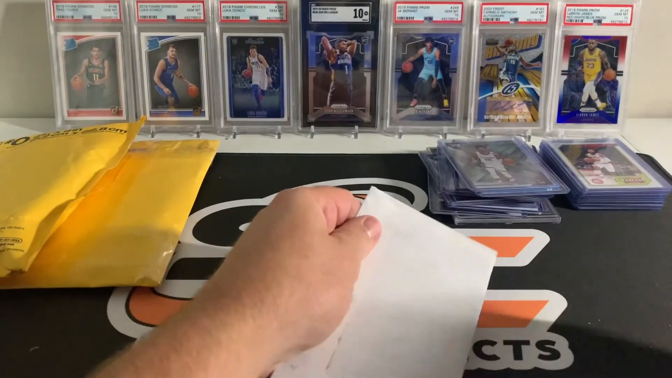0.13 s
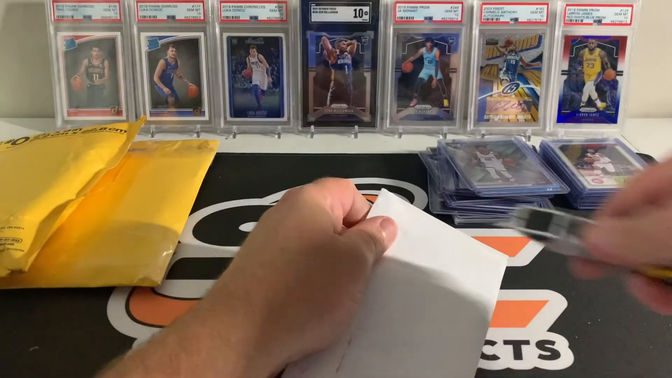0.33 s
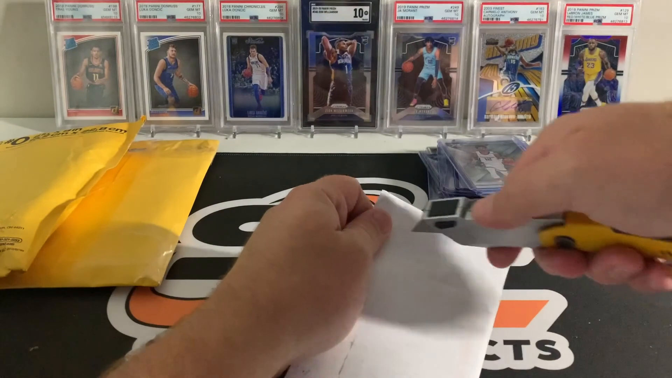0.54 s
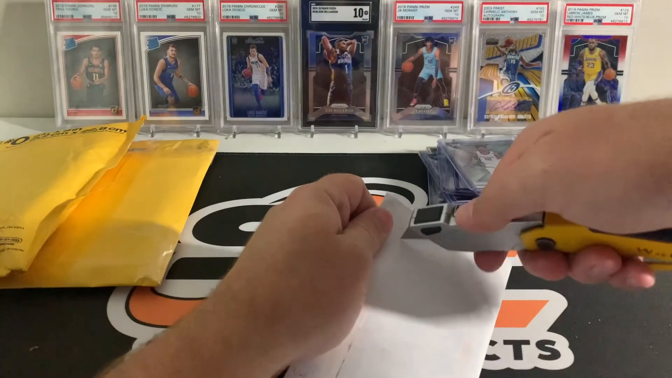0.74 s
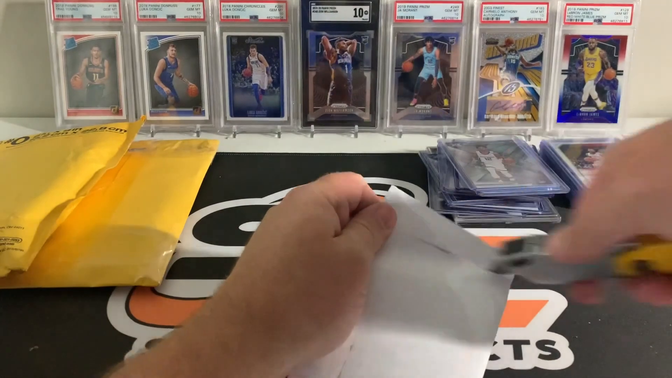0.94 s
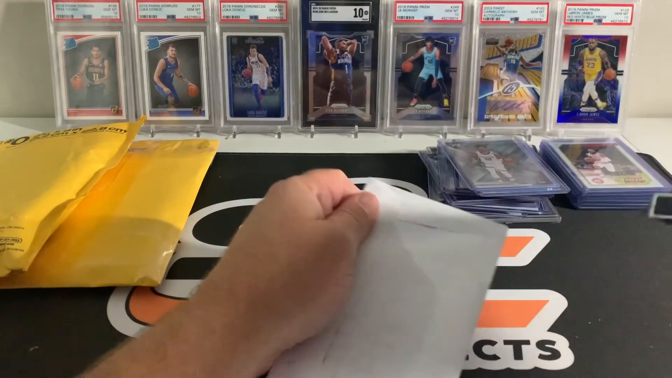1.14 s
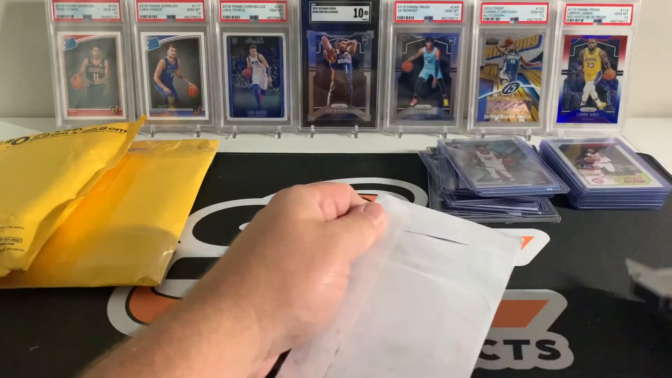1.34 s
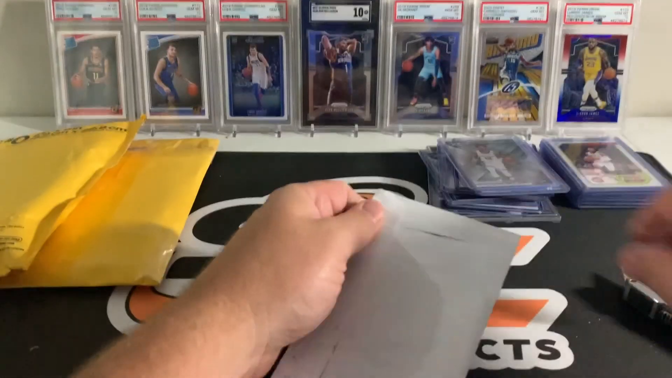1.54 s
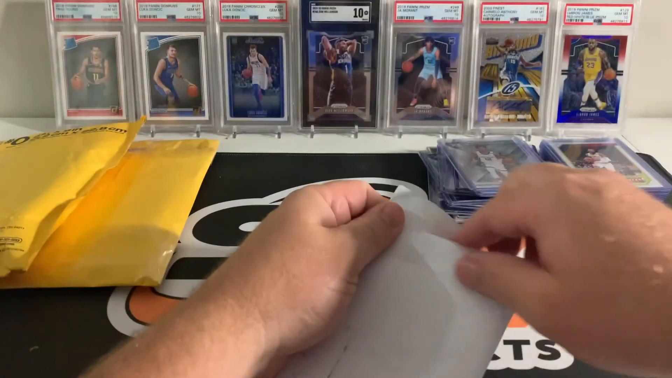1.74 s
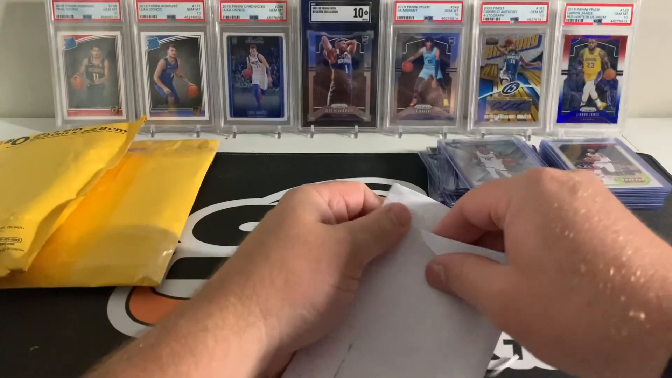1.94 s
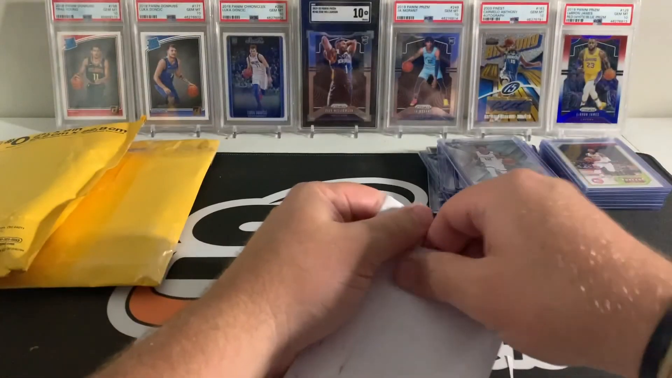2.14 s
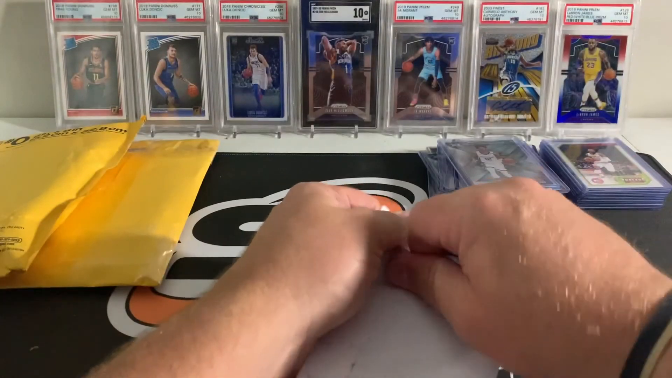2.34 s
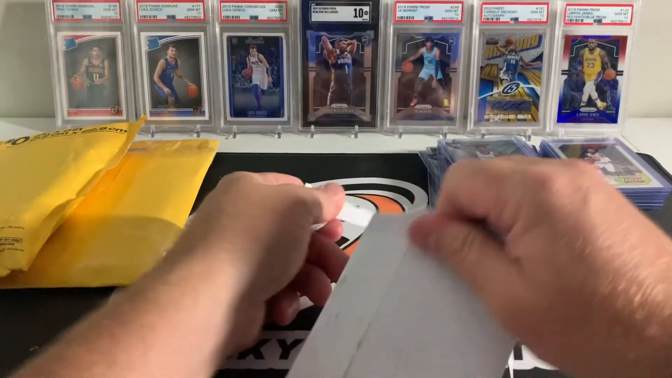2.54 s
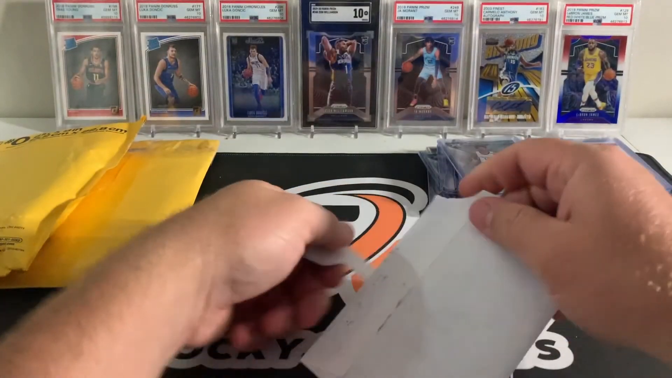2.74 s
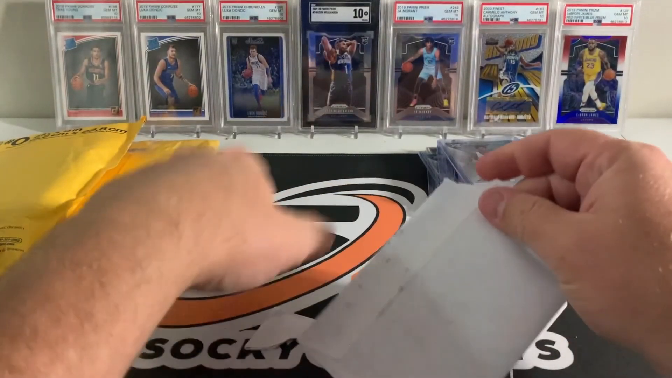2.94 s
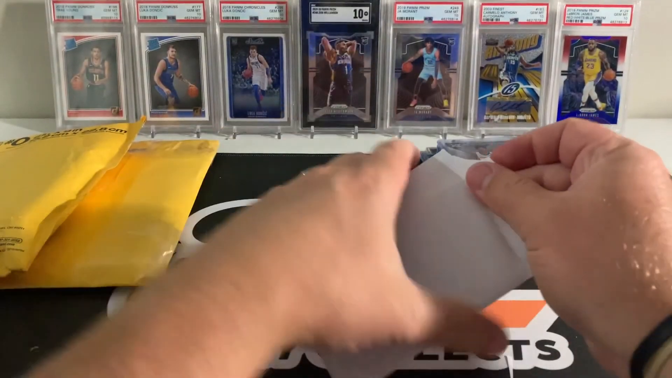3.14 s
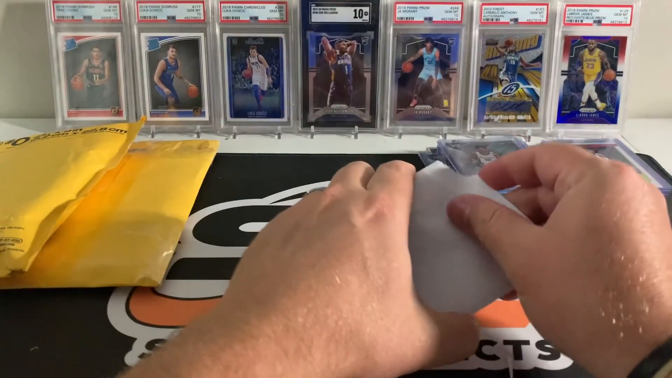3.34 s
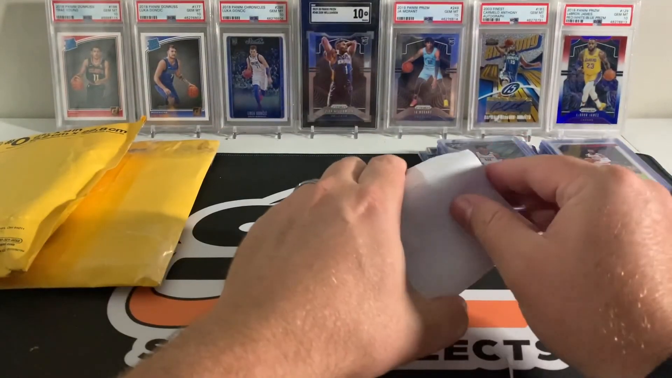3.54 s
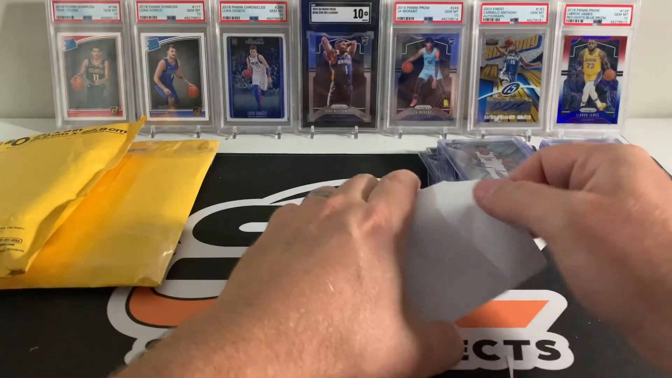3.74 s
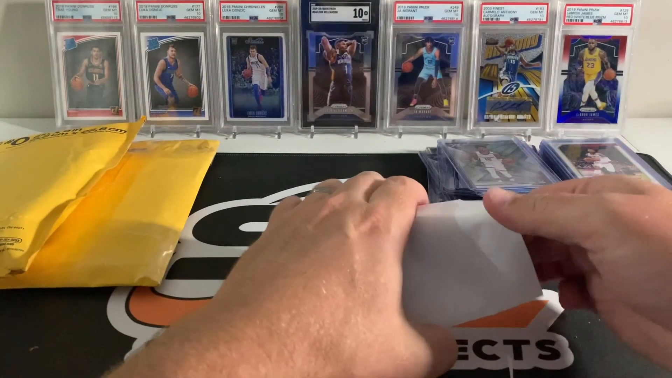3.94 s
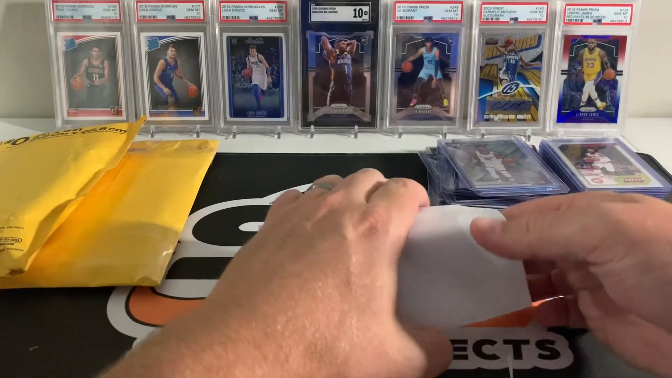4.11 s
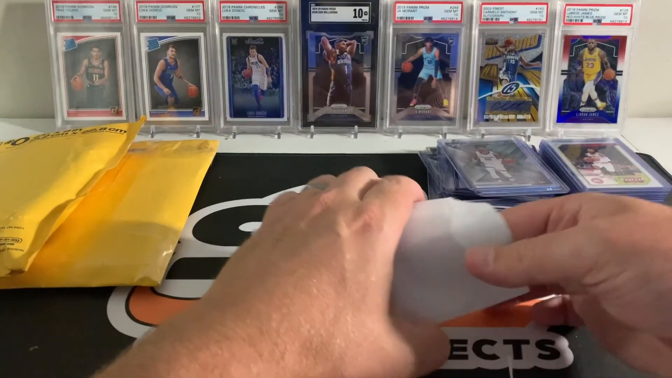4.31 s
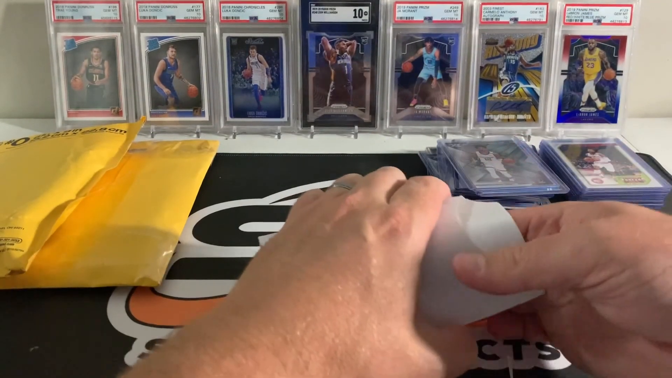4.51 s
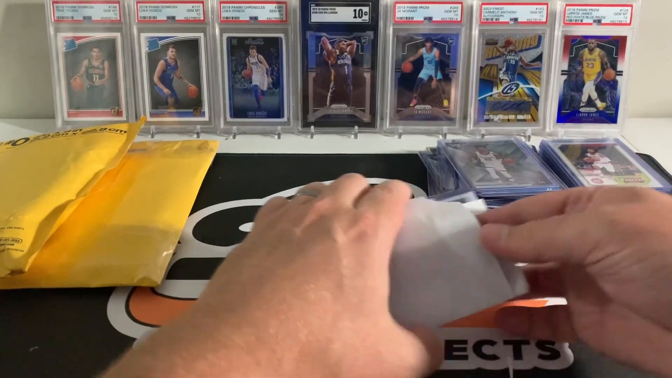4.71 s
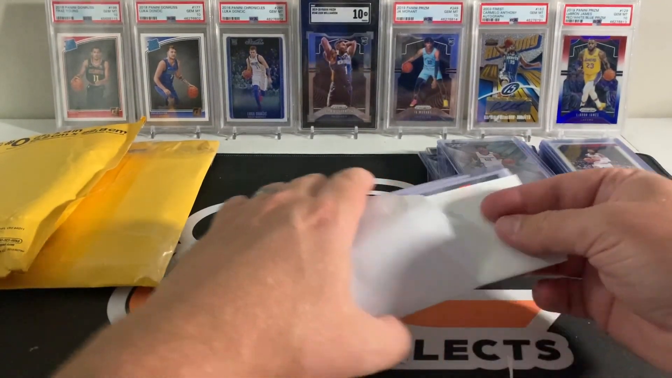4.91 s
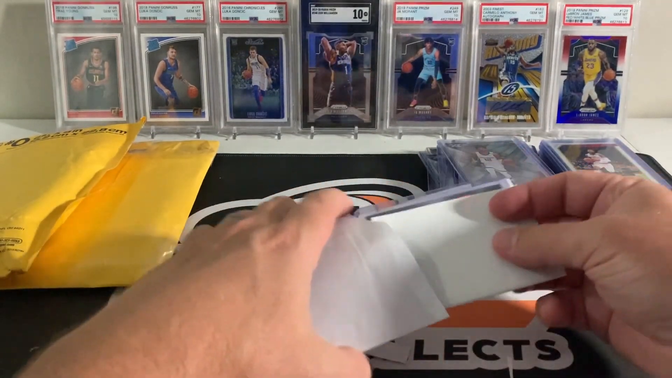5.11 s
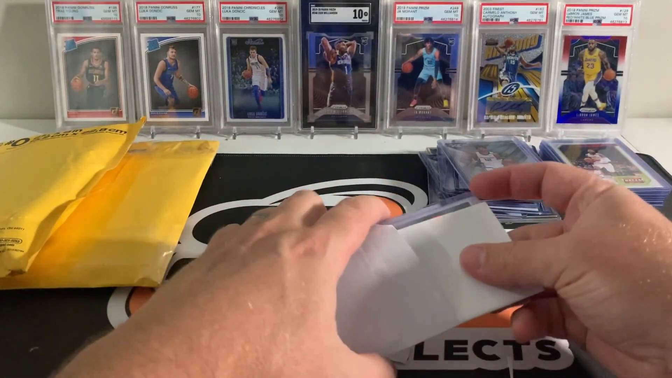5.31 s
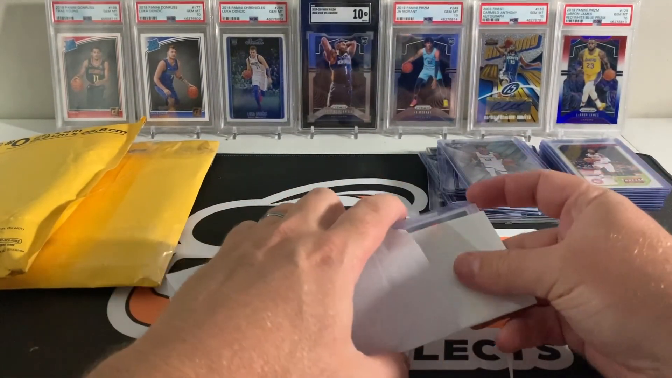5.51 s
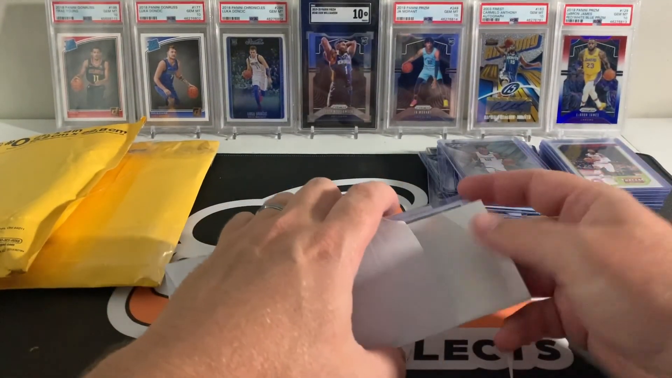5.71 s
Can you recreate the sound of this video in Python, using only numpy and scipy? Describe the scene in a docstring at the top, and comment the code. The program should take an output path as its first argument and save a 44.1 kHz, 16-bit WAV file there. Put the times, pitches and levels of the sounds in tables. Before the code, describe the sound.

A utility knife clicks and scrapes as it is picked up from a table. It slits a paper envelope in one quick zip, then is put down with a clatter and a low thump. The flap tears off in a short rip, and the envelope snaps and crinkles as it is squeezed open, ending with the contents sliding out. The microphone is close, in a quiet room.

```python
"""A paper envelope is slit with a utility knife, its flap torn off, its sides squeezed open and the contents
slid out. Fibres slip and break in clumps of tiny clicks; the sheet snaps, and rumbles as it bends.
The knife's loose parts click as it is picked up and laid down, and the table top booms under knocks.
All of it plays close to a small two-port microphone in a quiet room."""
import sys
import numpy as np
from scipy import signal
from scipy.fft import rfft, irfft
from scipy.io import wavfile
from scipy.ndimage import uniform_filter1d

SR = 44100
rng = np.random.default_rng(int(sys.argv[2]) if len(sys.argv) > 2 else 0)


def materialize(psi):
    """Save the field psi as 16-bit PCM at rate SR to the path in sys.argv[1].

    A 1-D psi becomes a single channel; in a 2-D psi each row is a channel.
    """
    bounded = np.clip(np.atleast_2d(psi).T, -1, 1)
    quanta = np.round(bounded * 32767).astype(np.int16)
    wavfile.write(sys.argv[1], SR, quanta)


N = 258426
TIME, HZ = np.arange(N) / SR, np.fft.rfftfreq(N, 1 / SR)


def slit():
    """The blade runs through the paper: a dense, even zip of breaking fibres."""
    # swell of the cut: (time [s], level [dB], brightness [dB])
    swell = [(0.89, -53, -8), (0.902, -62, -9), (0.908, -38.5, -6.5), (0.985, -25.5, 6), (1.02, -23, 4.5),
             (1.056, -26.5, 1), (1.094, -50.5, -14), (1.13, -81, 4)]
    # EQ of the cut: (frequency [Hz], gain [dB])
    colour = [(400, -10.5), (700, -9.5), (1000, -0.5), (1250, 1), (1500, 4), (1900, -1), (2400, -2.5),
              (5500, -4.5), (7000, -4.5), (12000, -2.5), (16000, -7)]
    grain = fibres(per_s=7000, spread_db=1.5, clump_db=0.9, smooth=1.2)
    return paper_voice(grain, colour, *level_and_treble(swell), patchy_db=0.73)


def tear():
    """The flap rips off: breaking fibres swell and brighten, then stop short."""
    # swell of the rip: (time [s], level [dB], brightness [dB])
    swell = [(2.3, -46, -23), (2.32, -43.5, -12), (2.388, -42, -6), (2.436, -30.5, -2), (2.52, -22.5, 5.5),
             (2.536, -42.5, -26.5), (2.6, -70, 11)]
    # EQ of the rip: (frequency [Hz], gain [dB])
    colour = [(400, -25), (800, -18.5), (1400, -8.5), (2800, -10.5), (5500, -9.5), (6800, -3),
              (8800, -12.5), (11000, -5), (14000, -6.5), (16000, -15.5)]
    grain = fibres(per_s=5400, spread_db=0, clump_db=1.2, smooth=1.3)
    return paper_voice(grain, colour, *level_and_treble(swell), patchy_db=3.3)


def snaps():
    """Paper snaps as the blade catches it, it rips, or it bends: a crack, a ringing panel, a buckle."""
    # paper snaps: (time [s], panel peak [dB], panel pitch [Hz], crinkle [dB re panel],
    # crack [dB re panel], buckle [dB re panel], buckle pitch [Hz])
    paper_snaps = [(0.776, -45.5, 1560, -4.5, -30, -5, 306), (.865, -24.5, 1230, -21, -26, -11.5, 372),
                   (0.91, -38.5, 1440, 10.5, -14, -10.5, 280), (1.058, -24.5, 1220, -6, 1, -5, 326),
                   (1.069, -32, 940, -1, -9, -9, 269), (1.167, -46.5, 1300, -8, -3, -16, 300),
                   (1.759, -39.5, 960, -13, 2, -8, 347), (1.918, -39, 1290, -20, -15, -6, 330),
                   (1.933, -28, 1060, -8, 2, -12.5, 332), (2.323, -35.5, 1200, -15, 0, -16, 366),
                   (2.434, -39, 1030, 4, 18, -15, 328), (2.451, -34.5, 1000, 14, 8, -16, 620),
                   (2.482, -27.5, 1580, 11.5, -4, -16, 397), (2.508, -47, 2150, 9, 6, -16, 328),
                   (2.518, -32.5, 1180, 0, 20, -10, 307), (2.521, -35, 1500, 9, 14, -16, 300),
                   (2.988, -45, 1180, -2, 8, 2, 328), (3.007, -40.5, 1550, 6.5, -21, 0, 175),
                   (3.019, -46.5, 1340, 3, -6, 1, 299), (3.256, -47.5, 960, 1, 2, -4.5, 243),
                   (3.282, -47, 1120, 9, -6, -22, 277), (3.305, -38, 1020, 0, -10, -22, 361),
                   (3.336, -41, 950, 7, 2, -9.5, 382), (3.393, -33.5, 1200, -1, -0.5, -13.5, 362),
                   (3.468, -26.5, 1730, 9.5, 17.5, -11, 402), (3.473, -24.5, 2550, -25, -22, -22, 332),
                   (3.525, -33, 1580, -4, 5, -4, 402), (3.55, -37, 1310, -3, -11, -3, 259),
                   (3.646, -34, 1680, 7, 8, 0.5, 373), (3.7, -28, 1110, -16, -40, -3.5, 452),
                   (3.713, -22.5, 1340, 0, -37, -14, 177), (3.753, -31.5, 980, -29, -26, -9, 374),
                   (3.777, -26, 1600, -14, -41, -4.5, 391), (3.8139, -26.5, 1540, 8, 12, -5, 312),
                   (3.944, -41.5, 1160, -2, -11, 4, 161), (3.977, -30, 1560, -18, -31, -11, 300),
                   (4.034, -23.5, 980, 0, -27, -0.5, 178), (4.102, -28.5, 890, -33, -8.5, -15, 181),
                   (4.267, -27.5, 1140, -25, -14, -6.5, 238), (4.331, -25.5, 1370, -12, -15, -14, 300),
                   (4.341, -12.5, 1340, -3.5, 1, -9, 341), (4.375, -23, 1280, -29, -20, -16, 327),
                   (4.394, -28.5, 1200, -16, -18, -22, 380), (4.451, -21, 1440, 0.5, 8.5, -17.5, 236),
                   (4.464, -30, 1180, -21, -26, -13, 410), (4.584, -40, 2090, -27, 3, -11, 223),
                   (4.647, -28.5, 1440, -30, -31, -8.5, 395), (4.69, -21, 1710, -3, 3, -11, 454),
                   (4.749, -31, 1350, 6.5, 0, -15, 480), (5.023, -18.5, 1220, 3, -21, -10.5, 450),
                   (5.201, -46, 920, -14, 0, 2, 270), (5.287, -56.5, 1990, -7, 1, 12, 457),
                   (5.577, -45, 2540, 3, 9, -3.5, 350), (5.635, -35.5, 940, -27, -29, -7, 350)]
    # modes of the whole envelope: (multiple of the buckle pitch, level [dB], t60 [s])
    buckle_modes = [(.55, -16, 0.055), (1.0, 7.5, 0.017), (1.9, -15, 0.039)]
    out, t = np.zeros(N), np.arange(4000) / SR
    rise_s, t60 = 0.001, 0.017
    shape = attack(t, rise_s) ** 2 * (decay(t, t60) + 0.15 * gain_of(-16 * t / t60))  # hit plus slow tail
    for s, db, panel_hz, crinkle_db, crack_db, buckle_db, buckle_hz in paper_snaps:
        burst = shape * rng.standard_normal(len(t))
        panel = narrowed(burst, panel_hz, q=1.13)
        crinkle = narrowed(burst, hz=3110, q=0.86)
        tick = attack(t, 0.00044) * (crack(t, t60=0.008) + gain_of(-12) * crack(t, t60=0.03))
        modes = [(ratio * buckle_hz, mode_db, ring_s) for ratio, mode_db, ring_s in buckle_modes]
        buckle = ring(modes, t) * attack(t, 0.0075)
        start = s - rise_s
        add(out, start, peaked(panel, db) + peaked(crinkle, db + crinkle_db))
        add(out, s, peaked(tick, db + crack_db))  # at the top of the snap
        add(out, start + 0.00372, peaked(buckle, db + buckle_db))  # the slow buckle follows the crack
    return out


def rubbing():
    """Fingers and paper slide on paper; each stroke swells and fades, and overlaps add in power."""
    # strokes: (peak time [s], rise [s], fall [s], level [dB], brightness [dB], flexing [dB re level])
    strokes = [(0.03, 0.19, 0.13, -55.5, 2, -2.5), (.194, 0.043, 0.084, -41, -4.5, -1.5),
               (0.301, 0.24, 0.22, -50.5, -10.5, -8), (0.609, 0.045, 0.14, -59.5, -13.5, -1.5),
               (.84, 0.092, .06, -61, -14, 1.5), (1.13, .03, 0.15, -56, -5, -12.5),
               (1.363, 0.1, 0.28, -55, -8, -16), (1.521, 0.016, 0.011, -37.5, -0.5, -11),
               (1.56, 0.046, 0.052, -42, -28, 3.5), (1.64, .05, 0.13, -63, -9, 0),
               (1.82, 0.063, 0.15, -48.5, 4, -12), (2.0, 0.15, 0.24, -47.5, -4.5, -21),
               (2.23, 0.091, 0.066, -41.5, 1.5, -40), (2.6, 0.1, 0.06, -54.5, 7.5, -8.5),
               (2.72, 0.094, 0.17, -51, 8.5, -15), (3.0, 0.17, 0.15, -60.5, 3.5, -7),
               (3.15, 0.046, 0.09, -62.5, 5, -18), (3.279, 0.028, 0.6, -54.5, 2.5, -13.5),
               (3.481, 0.026, 0.094, -36, -4, -12.5), (3.64, 0.048, 0.073, -45.5, -5, -16.5),
               (3.714, 0.019, 0.029, -34.5, -25, -8), (3.84, 0.12, 0.033, -42, -9, -12.5),
               (4.04, 0.19, 0.16, -41.5, -6.5, -9.5), (4.2, 0.072, 0.12, -48, -8, -5.5),
               (4.29, 0.06, 0.039, -40.5, -1.5, -12), (4.37, 0.057, 0.27, -38, -2, -15),
               (4.6, 0.02, 0.022, -42, -4.5, -17), (4.691, 0.039, 0.041, -31, -18.5, -17),
               (4.789, 0.12, 0.085, -36, 4.5, -24), (4.952, 0.096, 0.18, -40, 3, -32),
               (5.039, 0.06, 0.066, -39, -1.5, -14.5), (5.241, 0.074, 0.12, -47.5, 4.5, -10),
               (5.359, 0.082, 0.14, -48.5, 1, -18), (5.63, 0.25, 0.12, -44, -8.5, -17.5),
               (5.851, 0.085, .1, -48.5, -1.5, -13.5)]
    # EQ of the friction: (frequency [Hz], gain [dB])
    colour = [(400, -9.5), (700, -9), (1250, 0.5), (2100, -2.5), (3000, 0), (3700, -4.5), (4500, -1),
              (5600, -6), (6800, -1.5), (8000, -7), (11000, -1.5), (13000, -5.5), (16000, -5.5)]
    fade_db, roundness = 16, 2.09  # fade_db down at one rise before the peak and one fall after
    t, power = np.arange(0, N + 64, 64) / SR, 0
    for s, rise, fall, level_db, bright_db, flex_db in strokes:
        away = np.where(t < s, (s - t) / rise, (t - s) / fall)
        shape_db = np.maximum(level_db - fade_db * away ** roundness, -150)
        power = power + gain_of(shape_db + np.array([[0], [bright_db], [flex_db]])) ** 2
    level, treble, bending = [np.interp(TIME, t, np.sqrt(p)) for p in power]
    grain = fibres(per_s=3000, spread_db=2, clump_db=0.9, smooth=2.5)
    return paper_voice(grain, colour, level, treble, patchy_db=2.5) + flexing(bending)


def flexing(level):
    """The sheet rumbles as it bends under the fingers."""
    # EQ of the rumble: (frequency [Hz], gain [dB])
    colour = [(50, -26), (120, -3.5), (200, -4), (400, -4.5), (600, -24.5), (1200, -42.5)]
    return level * coloured(fibres(per_s=900, spread_db=1.2, clump_db=1.5, smooth=1.6), colour)


def knife_clicks():
    """Loose metal and plastic parts crack and rattle; the grip damps the handle and shifts its modes."""
    # clicks: (time [s], peak [dB], crack [dB re peak], hardness [dB/octave])
    clicks = [(0.17, -21.5, 0.5, 11), (0.286, -29.5, -4.5, 9.5), (0.384, -40.5, 2, -6),
              (0.392, -42.5, -21, -9), (1.226, -51.5, 7.5, -12), (1.276, -52.5, 4, 4),
              (1.471, -44, -24, -11), (1.512, -34, -0.5, -1.5), (1.535, -24, -6, 1), (1.572, -26, -1, 10.5)]
    # handle modes before the grip acts: (frequency [Hz], level [dB], t60 [s])
    modes = [(460, -8.5, 0.0072), (1330, -22, 0.12), (1950, 16.5, 0.026), (2840, 10.5, 0.26),
             (4040, 4.5, 0.097), (5014, 9.5, 0.023)]
    out, t = np.zeros(N), np.arange(4000) / SR
    rattle_s, grip_t60 = 0.003, 0.013
    for s, db, crack_db, hardness_db in clicks:
        rattle = rng.standard_normal(500) * np.exp(-t[:500] / rattle_s)
        detune = rng.uniform(0.782, 1.067)
        handle = ring(modes, t * detune, hardness_db) * decay(t, grip_t60)
        add(out, s, peaked(np.convolve(rattle, handle), db))
        add(out, s, peaked(crack(t, t60=0.014), db + crack_db))
    return out


def knife_drag():
    """The knife drags off the mat: a scrape with a thin, wavering squeak riding on it."""
    # the drag: (time [s], level [dB], squeak pitch [Hz], squeak [dB re level])
    gesture = [(0.171, -33, 3800, -17), (.19, -45.5, 3850, -3), (0.21, -40, 3750, 4.5),
               (0.229, -44, 3590, 1.5), (.25, -72, 3870, -17)]
    # EQ of the scrape: (frequency [Hz], gain [dB])
    colour = [(500, -4.5), (1100, -9), (1700, -6), (2500, -16), (6000, -30), (16000, -22.5)]
    s, level_db, hz, squeak_db = np.transpose(gesture)
    scrape = coloured(fibres(per_s=2300, spread_db=1, clump_db=1.5, smooth=1.2), colour)
    waver = uniform_filter1d(rng.standard_normal(N), size=200)
    pitch_hz = np.interp(TIME, s, hz) * (1 + 0.626 * waver)
    squeak = gain_of(np.interp(TIME, s, squeak_db)) * np.sin(2 * np.pi * np.cumsum(pitch_hz) / SR)
    return fader(s, level_db) * (scrape + squeak)


def table_knocks():
    """A soft push of a few ms sets the table top booming; harder blows favour the upper modes."""
    # knocks: (time [s], peak [dB], hardness [dB/octave], t60 factor: small where a hand stays on the top)
    knocks = [(0.076, -31.5, 7.5, 1.14), (.117, -32, 18, 1), (.135, -28.5, 12, 0.76), (0.167, -24, 14, 1.2),
              (.19, -30.5, 12, 3.5), (1.487, -38.5, -12, .6), (1.507, -21, -5.5, 0.4),
              (1.537, -22, -4.5, 2.1), (1.545, -19.5, 2.5, 0.91), (1.558, -24, -14, 1.1),
              (1.571, -15.5, -8.5, 0.25), (1.582, -24, -3, 1), (2.502, -48, -6, 1.1),
              (2.557, -43.5, 2, 0.48), (2.947, -28, 0, 0.54), (2.964, -30.5, -2.5, .28),
              (3.051, -34, 1.5, 0.86), (3.057, -32, 5.5, 0.41)]
    # modes of the top: (frequency [Hz], level [dB], t60 [s])
    top_modes = [(64.7, 7, 0.13), (70.5, -13.5, 0.96), (99, 8.5, 0.12), (143.5, 3.5, 0.14),
                 (281, 3.5, 0.079), (427.5, 2.5, 0.029)]
    out, t = np.zeros(N), np.arange(SR // 2) / SR
    for s, db, hardness_db, sustain in knocks:
        modes = [(hz, mode_db, t60 * sustain) for hz, mode_db, t60 in top_modes]
        add(out, s, peaked(ring(modes, t, hardness_db) * attack(t, 0.0076), db))
    return out


def lingering_hiss():
    """A faint, narrow band of hiss hangs on after the knife is lifted."""
    # swell of the hiss: (time [s], level [dB])
    swell = [(.25, -78), (.4, -73), (.58, -65.5), (.7, -68), (.77, -87)]
    band = evened(narrowed(rng.standard_normal(N), hz=1148, q=7.8))
    return fader(*np.transpose(swell)) * band


def room_tone():
    """The quiet room: a steady bed of bass-heavy noise."""
    # EQ of the bed: (frequency [Hz], gain [dB])
    colour = [(15, -3), (25, 11.5), (59, 21), (161, 1), (309, -3.5), (641, 1.5), (1160, -4), (2050, -54.5),
              (2690, -31), (6210, -28), (8590, -61.5), (10100, -56), (16000, -50.5)]
    return gain_of(-66) * coloured(rng.standard_normal(N), colour)


def ports(x):
    """Two microphone ports: the right hears the left's sound blended with a scattered copy."""
    # stereo image: (frequency [Hz], likeness [0-1], left minus right [dB], right phase lead [rad])
    image = [(60, 0.98, 1.8, 0.0029), (156, 0.86, -0.2, -0.4), (305, 1, .5, -0.35), (765, 0.29, -0.5, -0.6),
             (1194, 0.96, 2, -0.44), (1890, 0.86, 1.4, -1.36), (4620, 0.94, -2.5, -1.39),
             (5470, 0.18, -5, -2.3), (6740, 0.7, -0.5, -0.15), (8820, 1, 0, 0.047),
             (10600, 0.72, 1.5, 0.85), (12200, 0.57, -4, -0.45), (12400, 0.4, 5.5, 1), (14000, 1, -6, 0.34),
             (14600, 0.96, 5.5, 0.14)]
    lead_above_hz, lead_s = 6050, 9 / SR  # the right port's extra lead in the treble
    likeness = np.clip(on_grid(image), 0, 1)
    balance = gain_of(on_grid(image, column=2) / 2)
    lead = on_grid(image, column=3) + 2 * np.pi * np.maximum(HZ - lead_above_hz, 0) * lead_s
    direct, scattered = rfft(x), rfft(scatter(x, turns_per_s=14))
    right = (likeness * direct + np.sqrt(1 - likeness ** 2) * scattered) * np.exp(1j * lead)
    return irfft(np.array([direct * balance, right / balance]), N)


def scatter(x, turns_per_s):
    """Sound bounces off the table and moving hands: three short paths crossfade, now fast, now slowly."""
    pace = 1 + 0.8 * evened(uniform_filter1d(rng.standard_normal(N), size=4000))
    angle = 2 * np.pi * turns_per_s * np.cumsum(pace) / SR
    shares = [np.sqrt(2 / 3) * np.cos(angle + k * np.pi / 3) for k in range(3)]
    return sum(signal.oaconvolve(x * share, reflections(t60=0.012))[:N] for share in shares)


def reflections(t60, predelay_samples=0):
    """Sparse echoes of random sign that die away, with a total energy of 1."""
    taps, slots = np.zeros(SR // 3), np.arange(predelay_samples, SR // 3 - 20, 20)
    taps[slots + rng.integers(0, 20, len(slots))] = rng.choice([-1., 1.], len(slots))
    taps *= decay(np.arange(len(taps)) / SR, t60)
    return taps / np.linalg.norm(taps)


def fibres(per_s, spread_db, clump_db, smooth):
    """Fibres slip and break: clicks of uneven size in clumps, over a smooth hiss."""
    breaks = rng.random(N) < per_s / SR
    sizes = gain_of(spread_db * np.minimum(rng.exponential(1, N), 3.5))
    clicks = breaks * sizes * rng.standard_normal(N)
    drift = uniform_filter1d(uniform_filter1d(rng.standard_normal(N), size=300), size=200)
    clumps = gain_of(clump_db * evened(drift))
    return evened(clumps * (evened(clicks) + smooth * rng.standard_normal(N)))


def paper_voice(grain, colour, level, treble, patchy_db, crossover_hz=3800):
    """The sheet colours the fibre grain; body and treble each ride their own gain."""
    sound = patchy(coloured(grain, colour), patchy_db)
    bright = irfft(rfft(sound) / (1 + (crossover_hz / (HZ + 1)) ** 3), N)
    return level * (sound - bright) + treble * bright


def patchy(x, depth_db):
    """The bent sheet favours some pitches for a while, then others."""
    spectra = signal.stft(x, nperseg=512)[2]
    patches = uniform_filter1d(rng.standard_normal(spectra.shape), size=3, axis=0)  # across pitch
    patches = evened(uniform_filter1d(patches, size=24, axis=1))  # across time
    return evened(signal.istft(spectra * gain_of(depth_db * patches), nperseg=512)[1][:N])


def crack(t, t60):
    """A burst of treble with an instant attack, for paper snaps and knife parts."""
    # treble resonances: (centre [Hz], width [Hz], gain [dB])
    bands = [(7830, 2400, 10.5), (11000, 1400, 5), (14640, 2200, -1)]
    burst = rng.standard_normal(len(t)) * decay(t, t60)
    return sum(gain_of(db) * signal.lfilter(*signal.iirpeak(hz, hz / width, fs=SR), burst)
               for hz, width, db in bands)


def ring(modes, t, tilt_db=0.):
    """Struck modes, tilted by tilt_db per octave above the first."""
    return sum(gain_of(db + tilt_db * np.log2(hz / modes[0][0])) * decay(t, t60) * np.sin(2 * np.pi * hz * t)
               for hz, db, t60 in modes)


def narrowed(x, hz, q):
    """A resonance passed twice, for steep flanks."""
    b, a = signal.iirpeak(hz, q, fs=SR)
    return signal.lfilter(b, a, signal.lfilter(b, a, x))


def coloured(x, colour):
    """The sound through an EQ curve, at unit RMS."""
    return evened(irfft(rfft(x) * gain_of(on_grid(colour)), N))


def on_grid(points, column=1):
    """One column of a spectrum table, interpolated onto HZ in log frequency."""
    columns = np.transpose(points)
    return np.interp(np.log(HZ + 1), np.log(columns[0] + 1), columns[column])


def level_and_treble(swell):
    """Gains of the body and the treble along a swell."""
    s, level_db, bright_db = np.transpose(swell)
    level = fader(s, level_db)
    return level, level * gain_of(np.interp(TIME, s, bright_db))


def fader(s, level_db):
    """Gain along breakpoints, shut outside them."""
    return gain_of(np.interp(TIME, s, level_db, -120, -120))


def attack(t, rise_s):
    return 1 - np.exp(-t / rise_s)


def decay(t, t60):
    return gain_of(-60 * t / t60)


def gain_of(db):
    return 10 ** (np.asarray(db) / 20)


def evened(x):
    return x / np.sqrt(np.mean(x ** 2) + 1e-20)


def peaked(x, db):
    return gain_of(db) * x / abs(x).max()


def add(mix, s, sound):
    part = mix[round(s * SR):][:len(sound)]
    part += sound[:len(part)]


def scene():
    """Paper and knife, with a short room reverb, join the knocks and room tone at the two ports."""
    near = slit() + tear() + rubbing() + snaps() + knife_clicks() + knife_drag() + lingering_hiss()
    reverb = gain_of(-12.5) * signal.oaconvolve(near, reflections(t60=0.16, predelay_samples=200))[:N]
    knocks = table_knocks()
    airborne = near + reverb + room_tone() + 0.93 * knocks
    return ports(airborne) + 0.2 * knocks  # part comes through the stand, alike in both ports


def record(dry, low_cut_hz=49.6, high_cut_hz=15900):
    """The microphone drops the deepest bass and the very top of the treble."""
    thinned = signal.sosfilt(signal.butter(4, low_cut_hz, "high", fs=SR, output="sos"), dry)
    lowpass = signal.firwin(511, high_cut_hz, window=("kaiser", 9), fs=SR)
    return signal.oaconvolve(thinned, lowpass[None], "same")


dry = scene()
out = record(dry)
materialize(out)
```